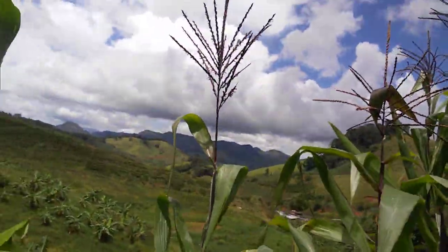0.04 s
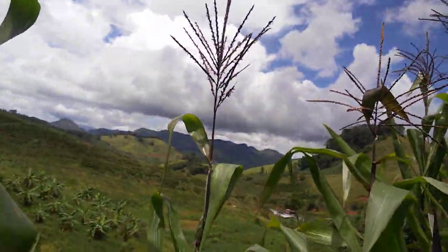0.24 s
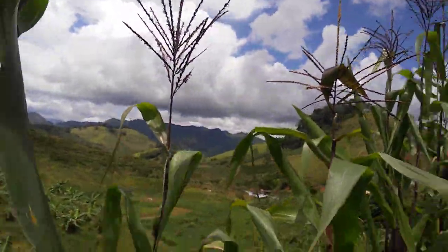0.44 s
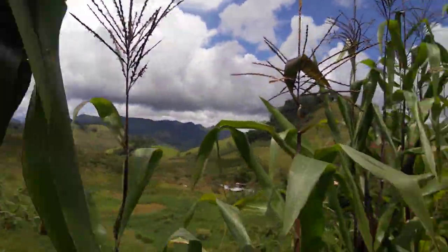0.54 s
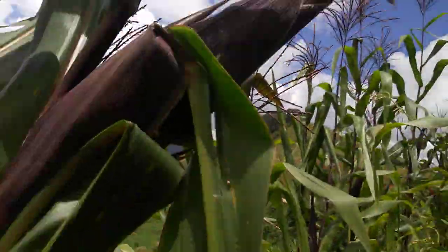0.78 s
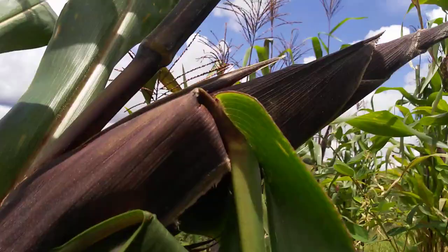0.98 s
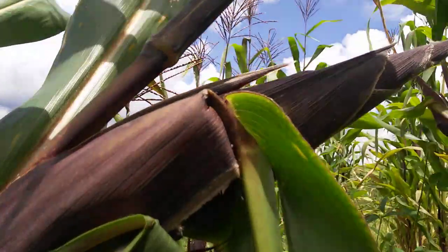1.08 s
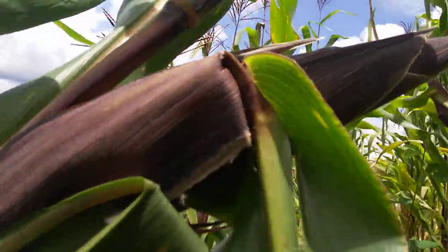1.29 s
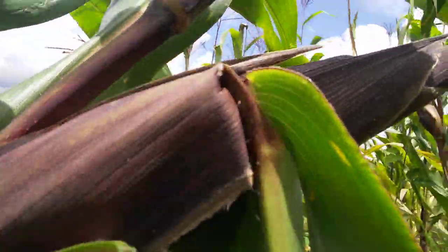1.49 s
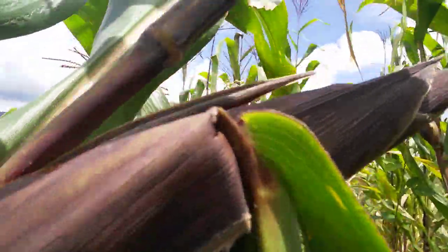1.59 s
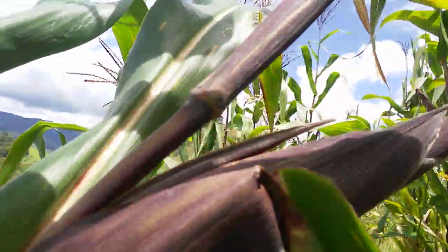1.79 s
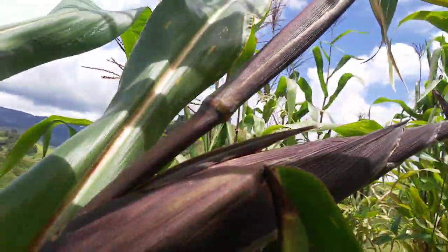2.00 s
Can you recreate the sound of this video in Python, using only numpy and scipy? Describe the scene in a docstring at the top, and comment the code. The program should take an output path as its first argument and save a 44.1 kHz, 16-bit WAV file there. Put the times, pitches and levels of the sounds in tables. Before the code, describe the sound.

Crisp crackling of a leafy corn stalk being handled, sharp at first, then thinning to faint rustles

```python
"""A dense, dry crackle of stiff leaves, as a hand grabs a corn stalk and pulls it close to a phone in a field.
The rubbing is tiny ringing slips over smooth noise; sharp cracks are noise bursts, each with a snap inside.
Soft low bumps come and go as slower bursts, over a faint stir of coloured noise.
The rustle grows sparser and fainter, with brief late swells; where it is faint, the phone's noise
suppressor leaves mainly its middle band."""
import sys
import numpy as np
from scipy import signal
from scipy.fft import rfft, irfft
from scipy.io import wavfile
from scipy.ndimage import uniform_filter1d

SR = 44100
rng = np.random.default_rng(int(sys.argv[2]) if len(sys.argv) > 2 else 0)


def int16_out(signal):
    """Quantize to a 16-bit WAV file."""
    q = np.round(np.clip(np.atleast_2d(signal).T, -1, 1) * 32767)
    wavfile.write(sys.argv[1], SR, q.astype(np.int16))


N = 89875  # length [samples]

LOW_EDGE_HZ, TREBLE_EDGE_HZ = 998, 5510  # where the low band ends and the treble begins
SMOOTH_SHARE = 0.46  # share of the rubbing's power that is smooth hiss; the rest is slips
PATCHY_DB, FLICKER_DB = 1, 0.7  # spread of the wander: shared by all bands, and of each band alone
BODY_HZ, BODY_OCTAVES = 2020, 0.18  # hard rubbing rings the leaf here
# Body level relative to the mid band [dB] when that stands at BODY_FROM_DB; growth in extra dB per dB
BODY_DB, BODY_GROWTH, BODY_FROM_DB = -12.5, 1.6, -29.5

# Colour of the leaf: (frequency [Hz], relative level [dB])
LEAF_COLOUR = [(105, -44.5), (170, -51.5), (300, -26.5), (509, -19.5), (812, -8), (1060, -5.5),
               (2100, -1.5), (3410, -6), (4650, -4), (7000, -12.5), (11600, -31), (15500, -39.5)]
# Strength of the rubbing: (time [s], mid-band level [dB], low-band level [dB], treble level [dB])
RUBBING_LEVELS = [(0, -34.5, -48.5, -47), (0.061, -35, -49, -48), (0.212, -37.5, -49, -49),
                  (0.233, -32, -52, -43), (0.273, -33.5, -49, -46.5), (0.326, -44.5, -68, -60),
                  (0.354, -38, -62, -49.5), (0.43, -38.5, -67, -55.5), (0.489, -35, -49.5, -49.5),
                  (.53, -28.5, -40, -42), (0.576, -39, -53, -51.5), (.84, -41, -59, -53.5),
                  (0.876, -36, -65, -45), (0.96, -40, -70, -50.5), (1.02, -41.5, -57, -56),
                  (1.131, -38, -64.5, -53), (1.27, -40, -65, -52.5), (1.338, -46, -78, -55.5),
                  (1.432, -41.5, -74, -59.5), (1.49, -48.5, -78.5, -65.5), (1.62, -49, -72, -58.5),
                  (1.699, -50, -70.5, -70.5), (1.787, -58, -72, -81), (1.803, -45.5, -70, -61.5),
                  (1.857, -56.5, -72.5, -71), (1.921, -44.5, -72.5, -65), (2.04, -42, -65, -54)]


def rubbing():
    """Slips over a smooth hiss, in the colour of the leaf; three bands swell on their own, hard rubbing rings."""
    t = np.arange(N) / SR
    hz = np.fft.rfftfreq(N, 1 / SR)
    time, *band_levels = np.array(RUBBING_LEVELS).T
    hiss = rng.standard_normal(N)
    grain = np.sqrt(SMOOTH_SHARE) * hiss + np.sqrt(1 - SMOOTH_SHARE) * slips()
    patchy = grain * undb(PATCHY_DB * walk(24.24))
    leaf = rfft(patchy) * undb(read(LEAF_COLOUR, hz))

    level = np.interp(t, time, band_levels[0])
    resonance = np.exp(-(np.log2((hz + 1) / BODY_HZ) / BODY_OCTAVES) ** 2 / 2)
    body_db = level + BODY_DB + BODY_GROWTH * (level - BODY_FROM_DB)
    out = unit(irfft(leaf * resonance, N)) * undb(body_db)

    low = 1 / (1 + (hz / LOW_EDGE_HZ) ** 12)
    treble = 1 - 1 / (1 + (hz / TREBLE_EDGE_HZ) ** 16)
    mid = 1 - low - treble
    for band, levels in zip((mid, low, treble), band_levels):
        band_db = np.interp(t, time, levels) + FLICKER_DB * walk(14.26)
        out += unit(irfft(leaf * band, N)) * undb(band_db)
    return out


SLIPS_PER_S, SLIP_S = 1300, 0.0023  # density and decay time of the slips
SLIP_SPREAD_DB, SLIP_TOP_DB = 3.5, 6.5  # scale of the random relative peaks, and their cap
SLIP_LOW_HZ, SLIP_HIGH_HZ = 491, 12670  # range of pitches
SLIP_RING_DB, SLIP_OCTAVES = 15.5, 0.12  # height and width of each ring


def slips():
    """Tiny slips of leaf on leaf: decaying noise bursts, each ringing briefly at a pitch of its own."""
    when, size, pitch = rng.random((int(SLIPS_PER_S * N / SR), 3)).T
    t = np.arange(512) / SR
    hz = np.fft.rfftfreq(len(t), 1 / SR) + 1
    ring_hz = SLIP_LOW_HZ * (SLIP_HIGH_HZ / SLIP_LOW_HZ) ** pitch
    ring = SLIP_RING_DB * np.exp(-.5 * (np.log2(hz / ring_hz[:, None]) / SLIP_OCTAVES) ** 2)
    peak_db = np.minimum(-SLIP_SPREAD_DB * np.log(1 - size), SLIP_TOP_DB)
    return unit(bursts(when * N / SR, peak_db, ring, np.exp(-t / SLIP_S)))


CRACK_RISE_S, CRACK_FALL_S = 0.00035, 0.0013
CRACK_TAIL_S, CRACK_TAIL_DB = 0.006, -16  # faint tail: decay time, level under the burst
RING_DB, RING_OCTAVES = 9, 0.22
CRACK_TOP_HZ = 9500  # the highs roll off above
CRACK_LOW_HZ, CRACK_LOW_REF_DB = 1230, -9  # edge of the low body; low-to-mid balance that leaves it uncut
SNAP_DB, SNAP_S = 12.5, 0.0007  # clean snap in the push: over the envelope's top, after the start
# Buckling leaves: (time [s], peak level [dB], ring frequency [Hz], treble boost [dB])
LEAF_CRACKS = [(0.19, -19, 1740, -5), (0.2239, -18.5, 2160, -20), (0.3486, -20.5, 2290, 5),
               (0.3736, -24, 1670, -7), (0.453, -25.5, 1790, -4), (0.4725, -20.5, 1820, -17),
               (.5162, -18, 2170, -4), (0.5512, -18, 5000, 3.5), (0.6122, -14, 1640, -4),
               (0.6192, -17.5, 2210, -4), (0.624, -9.5, 2720, -6), (0.6438, -26, 1840, -2),
               (0.6504, -16, 3970, -2), (0.655, -18.5, 2900, -6), (0.6787, -18.5, 1500, 0),
               (0.756, -15, 4100, 3.5), (0.775, -22, 4460, 2), (.778, -21, 1100, -16),
               (0.8178, -15, 2150, -3), (0.862, -21, 4530, 4), (0.8742, -21, 4800, 6),
               (0.8855, -26.5, 2180, 5), (1.0095, -25, 4800, 4), (1.0207, -21.5, 1610, 7.5),
               (1.0403, -21, 1720, -5), (1.0708, -22.5, 4900, 13), (1.12, -24.5, 3120, -16),
               (1.129, -28, 1880, -11), (1.5031, -16.5, 4800, 8), (1.6, -19, 2300, 10),
               (1.799, -34, 3000, -8), (1.9675, -23.5, 1900, -8)]


def cracks():
    """A leaf buckles: a snap in a noise burst of a few ms, leaf-coloured, with its own ring and a faint tail."""
    time, peak_db, ring_hz, treble_db = np.array(LEAF_CRACKS).T
    t = np.arange(2048) / SR
    hz = np.fft.rfftfreq(len(t), 1 / SR) + 1
    fall = np.exp(-t / CRACK_FALL_S) + undb(CRACK_TAIL_DB) * np.exp(-t / CRACK_TAIL_S)
    envelope = (1 - np.exp(-t / CRACK_RISE_S)) * fall
    snap = undb(SNAP_DB) * envelope.max() * (np.arange(len(t)) == int(SNAP_S * SR))

    ring = RING_DB * np.exp(-.5 * (np.log2(hz / ring_hz[:, None]) / RING_OCTAVES) ** 2)
    treble = treble_db[:, None] / (1 + (TREBLE_EDGE_HZ / hz) ** 4)
    roll_off = -10 * np.log10(1 + (hz / CRACK_TOP_HZ) ** 4)
    # where the rubbing around it is thin in the lows, a crack loses low body too
    rub_time, rub_mid, rub_low, _ = np.array(RUBBING_LEVELS).T
    balance_db = np.interp(time, rub_time, rub_low - rub_mid)
    low_db = np.minimum(balance_db - CRACK_LOW_REF_DB, 0)
    low = low_db[:, None] / (1 + (hz / CRACK_LOW_HZ) ** 10)
    colour_db = read(LEAF_COLOUR, hz) + ring + treble + roll_off + low
    return bursts(time, peak_db, colour_db, envelope, snap)


BUMP_RISE_S, BUMP_FALL_S, BUMP_OCTAVES = 0.0024, 0.012, 0.26
# Soft bumps: (time [s], peak level [dB], centre frequency [Hz])
SOFT_BUMPS = [(0.68, -56.5, 341), (0.76, -50, 324), (0.785, -51, 390), (0.84, -55.5, 320),
              (1.138, -59.5, 338), (1.188, -58.5, 353), (1.29, -52, 510), (1.515, -54, 890),
              (1.843, -59, 358), (1.972, -61.5, 410)]


def bumps():
    """Soft low bumps, perhaps the stalk against the hand: noise bursts in a narrow band."""
    time, peak_db, bump_hz = np.array(SOFT_BUMPS).T
    t = np.arange(8192) / SR
    hz = np.fft.rfftfreq(len(t), 1 / SR) + 1
    envelope = (1 - np.exp(-t / BUMP_RISE_S)) * np.exp(-t / BUMP_FALL_S)
    distance = np.log2(hz / bump_hz[:, None]) / BUMP_OCTAVES
    colour_db = -10 * np.minimum(distance ** 2, 4.5)
    return bursts(time, peak_db, colour_db, envelope)


FIELD_DB = -51  # RMS level
# Colour of the open field: (frequency [Hz], relative level [dB])
FIELD_COLOUR = [(150, -52), (260, -26), (1300, -25), (1660, -22), (1740, 9.5), (1830, -12), (3900, -4.5),
                (4150, 3.5), (4400, -7), (5300, -7), (6000, -39.5), (12000, -59)]


def field():
    """The faint stir of the open field: steady coloured noise with two thin whistling bands in it."""
    hz = np.fft.rfftfreq(N, 1 / SR)
    noise = rfft(rng.standard_normal(N))
    return undb(FIELD_DB) * unit(irfft(noise * undb(read(FIELD_COLOUR, hz)), N))


def scene():
    """Leaves, bumps and open field together, as one channel."""
    return (rubbing() + cracks() + bumps() + field())[None]


GATE_DEPTH_DB, GATE_MEMORY_S = -16, 0.022  # lowest gain; averaging time of the power
# The phone's noise suppressor: (frequency [Hz], threshold per bin [dB])
GATE_THRESHOLD = [(300, -98.5), (700, -81), (1250, -67.5), (1700, -78), (5000, -70), (6500, -81.5),
                  (10000, -102)]


def suppress(x):
    """Each narrow band is turned down while its recent power lies near or under the threshold."""
    hz, t, bins = signal.stft(x, SR, nperseg=512, noverlap=384)
    keep = np.exp(-t[1] / GATE_MEMORY_S)
    power = signal.lfilter([1 - keep], [1, -keep], np.abs(bins) ** 2, axis=-1)
    power = power + undb(-300)  # never zero
    threshold = undb(2 * read(GATE_THRESHOLD, hz))[:, None]  # as power
    gain = np.maximum(1 - threshold / power, undb(GATE_DEPTH_DB))
    return signal.istft(bins * gain, SR, nperseg=512, noverlap=384)[1][..., :N]


def record(dry):
    """The phone suppresses faint noise and cuts the top steeply above 15.8 kHz."""
    top_cut = signal.ellip(10, .2, 60, 15800, fs=SR, output="sos")
    return signal.sosfilt(top_cut, suppress(dry))


def bursts(times, peak_db, colour_db, envelope, snap=0):
    """Short noise bursts, each ringing a causal filter with its own spectrum, scaled to its peak."""
    size = len(envelope)
    push = rng.standard_normal((len(times), size)) * envelope + snap
    # fold the cepstrum forward in time: a minimum-phase filter
    fold = np.where(np.arange(size) < size // 2, 2, 0) - (np.arange(size) == 0)
    cepstrum = irfft(np.log(undb(colour_db)), size)
    colour = np.exp(rfft(cepstrum * fold))
    x = irfft(rfft(push) * colour, size)
    x *= (undb(peak_db) / np.abs(x).max(axis=1))[:, None]
    out = np.zeros(N + size)
    starts = (times * SR).astype(int)
    np.add.at(out, starts[:, None] + np.arange(size), x)
    return out[:N]


def walk(rate):
    """Random levels held 1 / rate s and slewed twice; spread near 1."""
    hold = int(SR / rate)
    steps = np.repeat(rng.standard_normal(N // hold + 1), hold)
    return 1.11 * uniform_filter1d(uniform_filter1d(steps, hold), hold)[:N]


def read(table, hz):
    """A spectrum table read on a log-frequency axis."""
    table_hz, db = np.array(table).T
    return np.interp(np.log(np.maximum(hz, 1)), np.log(table_hz), db)


def unit(x):
    """Scale to an RMS of 1."""
    return x / np.sqrt(np.mean(x ** 2))


def undb(db):
    """Decibels to amplitude."""
    return 10 ** (np.asarray(db) / 20)


dry = scene()
out = record(dry)
int16_out(out)
```